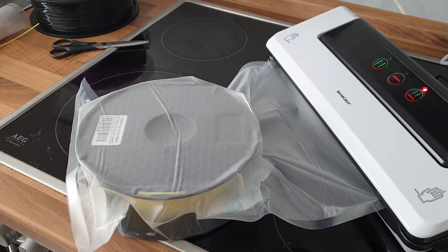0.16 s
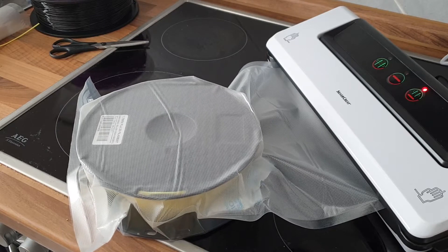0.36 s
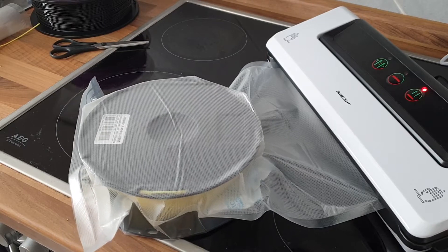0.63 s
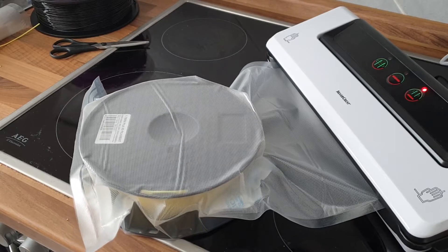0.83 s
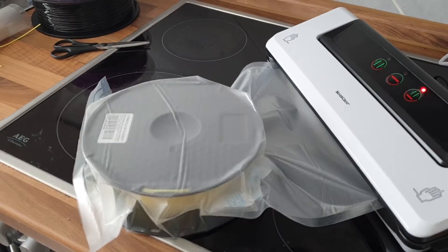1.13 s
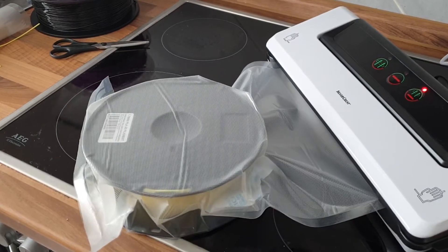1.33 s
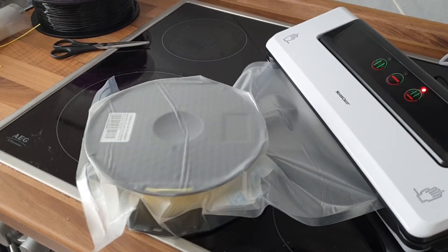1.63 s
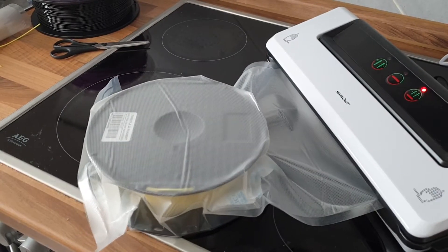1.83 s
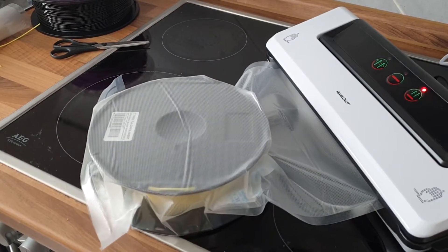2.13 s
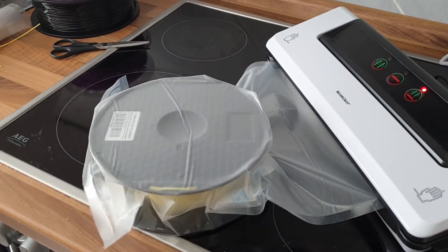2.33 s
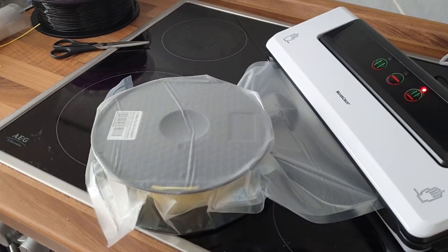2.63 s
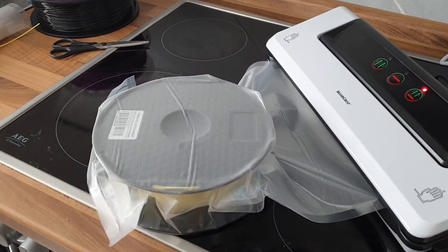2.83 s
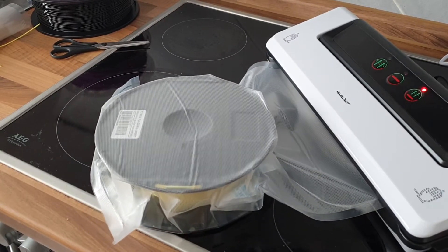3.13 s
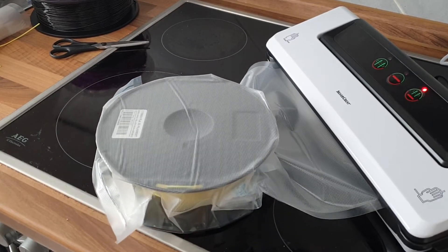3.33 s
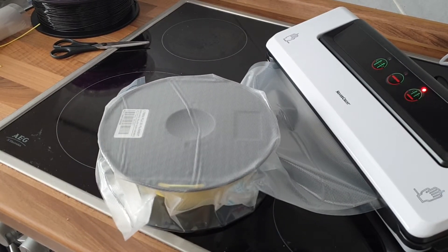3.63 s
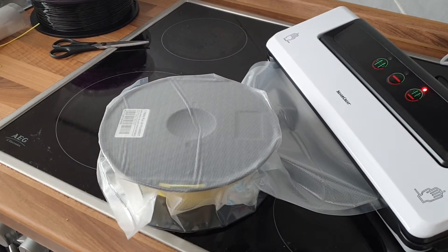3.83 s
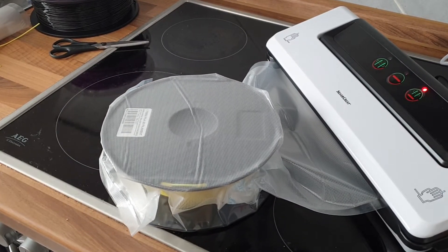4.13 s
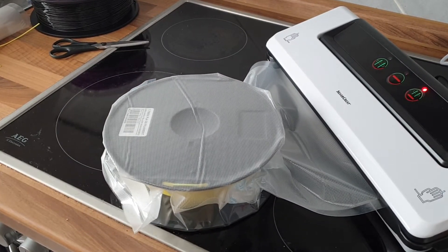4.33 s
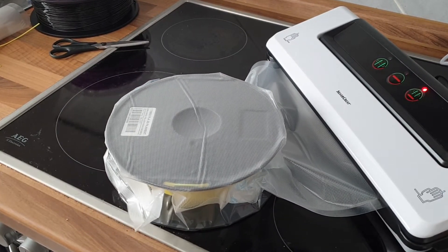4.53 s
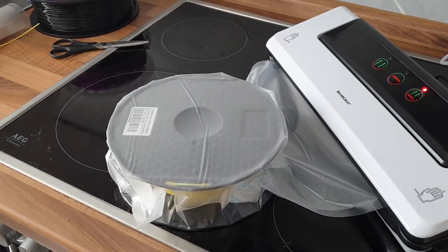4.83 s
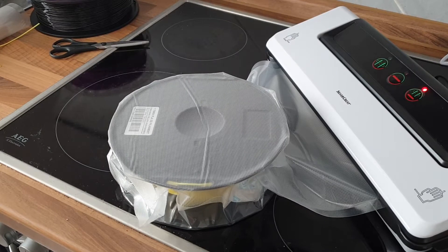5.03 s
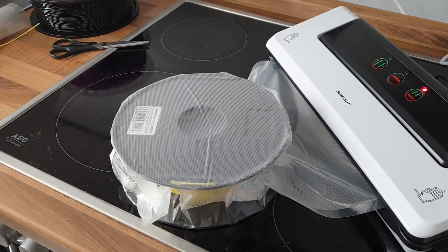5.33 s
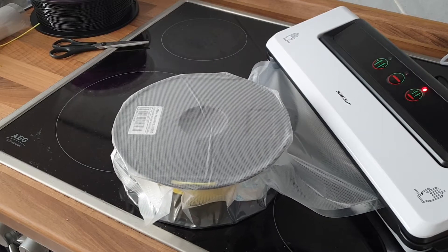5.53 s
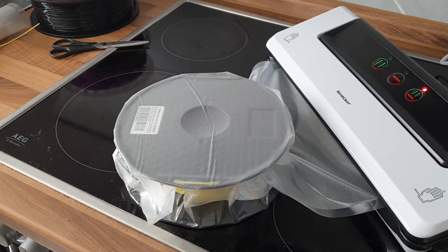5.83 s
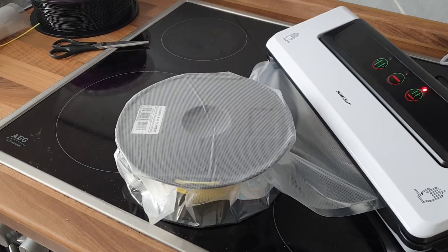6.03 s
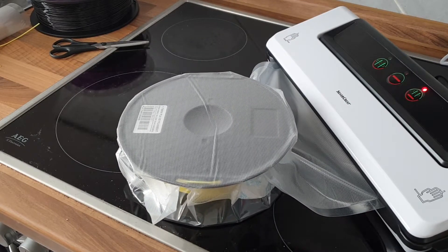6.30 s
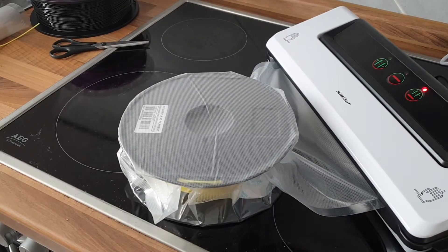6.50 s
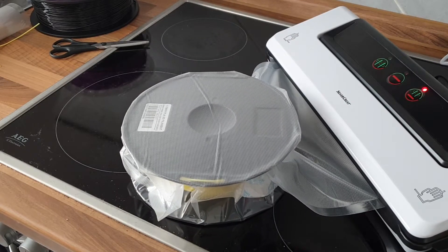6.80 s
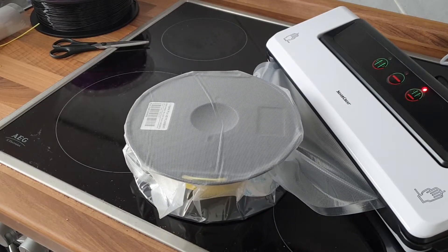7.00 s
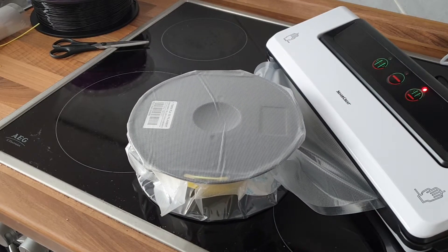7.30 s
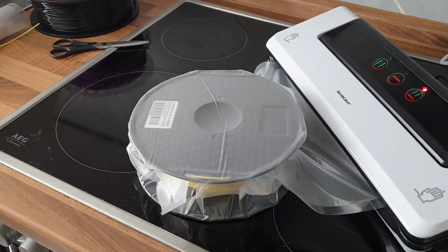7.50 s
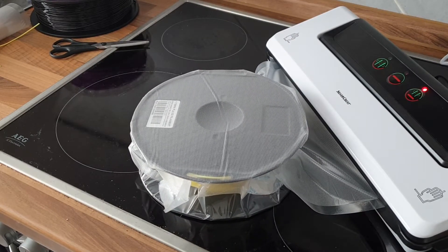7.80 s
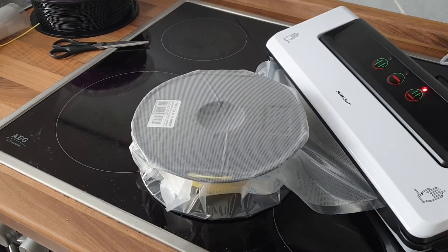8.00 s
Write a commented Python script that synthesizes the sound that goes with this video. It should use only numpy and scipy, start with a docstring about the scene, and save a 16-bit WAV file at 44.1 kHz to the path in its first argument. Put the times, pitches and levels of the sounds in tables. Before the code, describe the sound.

Steady low electric pump hum with rapid valve ticking and airy hiss, slowing very slightly, with sparse sharp crinkles of tightening plastic bag.

```python
"""A fast hum with ticks and puffs, about 70 a second: a countertop vacuum sealer's little piston pump.
It sucks the air out of a plastic bag round a lidded bowl in a kitchen, slowing and changing colour.
One shaft times the hum (sine partials), valve ticks (clicks into rings), air and puffs (shaped noise)
and valve buzzes (pulsing sines). Now and then the film snaps into creases (short noise bursts),
followed by echoes and the ring of the room."""
import sys
import numpy as np
from scipy import signal
from scipy.fft import rfft, irfft, next_fast_len
from scipy.io import wavfile

SR = 44100
rng = np.random.default_rng(int(sys.argv[2]) if len(sys.argv) > 2 else 0)


def wav_record(signal):
    """Record a signal, one row per channel, as 16-bit PCM in the file named by sys.argv[1]."""
    frames = np.transpose(np.atleast_2d(signal))
    bounded = np.clip(frames, -1, 1)
    # unit amplitude maps onto the largest positive 16-bit level
    quanta = np.round(bounded * 32767).astype(np.int16)
    wavfile.write(sys.argv[1], SR, quanta)


N = 359415
TIME = np.arange(N) / SR


def from_db(db):
    """Decibels to gain."""
    return 10 ** (np.asarray(db) / 20)


def rms_one(x):
    """Scale to rms 1."""
    return x / np.sqrt(np.mean(x ** 2) + 1e-20)


def in_time(rows):
    """A curve at every sample."""
    return np.interp(TIME, *np.transpose(rows))


def at_hz(points, hz, axis=1):
    """Read one column of a table along log frequency."""
    points = np.array(points, float)
    return np.interp(np.log(np.maximum(hz, 1)), np.log(points[:, 0]), points[:, axis])


def pan(lean_db):
    """Left and right gains of constant power; a positive lean is to the left."""
    gains = from_db(np.array([[1], [-1]]) * lean_db / 2)
    return gains / np.sqrt(np.mean(gains ** 2, axis=0))


def resonance(hz, centre, width):
    """A resonant peak of height 1, half as high at half its width to either side."""
    return 1 / (1 + (2 * (hz - centre) / width) ** 2)


def colour(x, points, rings=(), lean=None):
    """Causal (minimum-phase) filter from a spectrum and resonant peaks, with a left-right lean."""
    size = 2 * next_fast_len(x.shape[-1] // 2 + SR // 10)
    hz = np.arange(size // 2 + 1) * SR / size
    level_db = at_hz(points, hz)
    for centre, width, db in rings:
        level_db = level_db + db * resonance(hz, centre, width)
    # folding the cepstrum onto positive times gives the minimum phase
    cepstrum = irfft(np.log(from_db(level_db)))
    cepstrum[1:size // 2] *= 2
    cepstrum[size // 2 + 1:] = 0
    response = np.exp(rfft(cepstrum))
    if lean:
        response = response * pan(at_hz(lean, hz))
    return irfft(rfft(x, size) * response)[..., :x.shape[-1]]


def drift(rate):
    """Slow random wandering through `rate` knots a second, each of spread 1."""
    knots = rng.standard_normal(N // 20)
    return np.interp(TIME * rate, np.arange(len(knots)), knots)


def stereo_noise(size, alike):
    """White noise, partly shared by the two sides."""
    alike = np.clip(alike, 0, 1)
    shared = np.sqrt(alike) * rng.standard_normal(size)
    return shared + np.sqrt(1 - alike) * rng.standard_normal((2, size))


def dying(t60, alike, size=SR // 2):
    """A dense noise ring that falls 60 dB in t60 seconds, of energy 1."""
    fall = from_db(-60 * TIME[:size] / t60)
    return rms_one(stereo_noise(size, alike) * fall) / np.sqrt(size)


def gate(turns, at, depth_db):
    """A swell once in every turn, strongest at that share of the turn (weakest if the depth is negative)."""
    return rms_one(from_db(depth_db * np.cos(2 * np.pi * (turns - at))))


# the motor slows as the vacuum builds: (time [s], speed [turns/s])
SPEED = [(0, 71.458), (1.5, 71.172), (4.3, 70.777), (6.6, 70.133), (8.15, 69.849)]


def shaft():
    """Turns made by the shaft so far: its slowing speed, slightly unsteady, summed over time."""
    return np.cumsum(in_time(SPEED) + .025 * drift(25)) / SR - .11


# load on the pump: a slow creep, and a smooth step as the slack runs out
CREEP_PER_S, TIGHT_AT_S, TIGHTENING_S, TIGHT_LOAD = 0.012, 5.07, 0.43, 0.97


def suction():
    """Load (0 = free flow, 1 = bag drawn tight) creeps up, then climbs as the bag closes round the bowl."""
    closing = TIGHT_LOAD / (1 + np.exp((TIGHT_AT_S - TIME) / TIGHTENING_S))
    return CREEP_PER_S * TIME + closing - .05


# phase lag that each partial adds to the one below; the higher ones leave the housing later in the turn:
# (frequency [Hz], added lag [cycles], random scatter [rad])
LAG = [(212, 0, .03), (355, .8, .2), (430, .85, .9), (800, 1.35, 1.1), (1400, 2.0, 1.5), (1560, 2.05, .2),
       (1950, 2.35, .2), (2150, 2.3, 1.2)]
WHINE_TOP_HZ = 2150   # no partials above this
# the reflected share of a partial grows with its pitch
REFLECTED_HALF_HZ, REFLECTED_MOST = 560, 0.86


def hum(turns, load, waver_db):
    """Clean multiples of the speed; higher ones lag and waver more and reach the two sides out of step."""
    out, behind = np.zeros((2, N)), 0
    speed = in_time(SPEED)[::2000]
    for order in range(1, int(WHINE_TOP_HZ / speed.mean()) + 1):
        hz = order * speed.mean()
        free_db, loaded_db, lean_db = partial(order, speed)
        reflected = REFLECTED_MOST / (1 + (REFLECTED_HALF_HZ / hz) ** 4)
        behind += at_hz(LAG, hz)
        scatter = at_hz(LAG, hz, axis=2) * rng.normal()
        angle = (2 * np.pi * ((order * turns - behind) % 1) + scatter).astype(np.float32)
        waver = waver_db * hz / 1000 * drift(9)
        level = from_db(free_db + load * (loaded_db - free_db) + waver)
        gains = pan(lean_db)
        # reflections bring in a part that is a quarter cycle off, opposite on the two sides
        side = gains.min(axis=0) * reflected * rng.choice([-1, 1])
        direct = np.sqrt(np.abs(gains ** 2 - side ** 2)) * np.cos(angle)
        out += level * (direct + side * np.array([[1], [-1]]) * np.sin(angle))
    return out


# low hum of the housing, relative levels:
# (multiple of the speed, free-flow level [dB], loaded level [dB], left-right lean [dB])
HUM = [(1, -41.8, -39.1, 0.9), (2, -27.7, -28.6, 0.2), (3, -31.6, -33.9, 2.3), (4, -52, -40.7, 4.6),
       (5, -44.5, -44.0, 8.7), (6, -48.3, -46.5, -8.2), (7, -46.3, -46.2, -1.3), (8, -43.7, -46.6, -8.2),
       (9, -50, -40.7, -7.9), (10, -61, -51, -2.4), (11, -47.5, -53.2, 2.7), (12, -50.5, -48.5, 0.5)]
# cavities of the pump and its outlet, which the partials slide through as the motor slows:
# (frequency [Hz], width [Hz], free-flow boost [dB], loaded boost [dB], left-right lean [dB])
CAVITIES = [(978, 28, 16.5, 12, -7.5), (1129.3, 23, 14, 12.5, 19), (1194, 18.5, -2.5, 2.5, 12),
            (1265, 8.5, -4, 6, -5), (1614, 54, 9.5, -2, 2), (1693.6, 94, 16.5, 12, 8),
            (1835.4, 122, 13, 7, -2.5)]
# above the hum the multiples are weak and even, except where a cavity rings (relative levels)
WHINE_DB, WHINE_LOAD_DB, WHINE_LEAN_DB = -58, 1, -1.5


def partial(order, speed):
    """Free-flow level, loaded level and lean of one multiple, in dB: housing hum or cavity-lifted whine."""
    if order <= len(HUM):
        return HUM[order - 1][1:]
    hz = order * speed
    free, loaded, lean = sum(np.outer(dbs, resonance(hz, centre, width))
                             for centre, width, *dbs in CAVITIES)
    when = np.linspace(0, TIME[-1], len(hz))
    free_db = np.interp(TIME, when, WHINE_DB + free)
    loaded_db = np.interp(TIME, when, WHINE_DB + WHINE_LOAD_DB + loaded)
    return free_db, loaded_db, WHINE_LEAN_DB + lean.mean()


# the two valves shutting: (share of a turn, relative level [dB])
VALVES = [(.44, -1.5), (.9, 0.5)]
# spectrum of their ticking: (frequency [Hz], relative level [dB])
TICK = [(1900, -33.5), (2200, -0.5), (2700, -3.5), (3600, 0), (4500, -2), (5300, -4.5), (5800, 0),
        (6400, -7), (7600, -6.5), (8500, -26), (9600, -13.5), (15500, -11)]
# rings of the pump body, also heard in the air: (frequency [Hz], width [Hz], free-flow [dB], loaded [dB])
BODY = [(2356, 240, 0.5, 8), (3010, 38, 8, 4), (3330, 34, 9, 10), (4288, 59, 12, 7), (4980, 140, 2, 7),
        (5660, 144, 10, 1.5), (7100, 180, -2, 2.5), (7750, 260, 8.5, 1.5), (9600, 160, 5, -11)]
# the pump's treble from side to side, also for the air: (frequency [Hz], left-right lean [dB])
LEAN = [(60, 3), (110, -7), (200, 8), (380, -7), (700, -6), (1290, -9), (2380, 6), (4400, 2), (8120, -2),
        (15000, -6.5)]


def valves(turns, load, jitter_s, uneven_db, ring_t60, room_db):
    """Each valve shuts once a turn and rings the pump body; the load shifts which rings are strong."""
    free, tight, count = np.zeros((2, N)), np.zeros((2, N)), int(turns[-1])
    for share, level_db in VALVES:
        shut_turns = np.arange(count) + share
        when = np.interp(shut_turns, turns, TIME) + jitter_s * rng.standard_normal(count)
        force = from_db(level_db + uneven_db * rng.standard_normal(count))
        # a short sinc places each click between samples
        taps = (when * SR).astype(int)[:, None] + np.arange(-6, 7)
        clicks = np.zeros(N)
        clicks[np.clip(taps, 0, N - 1)] = force[:, None] * np.sinc(taps - when[:, None] * SR)
        for state in (free, tight):
            housing = dying(ring_t60, alike=0.01) + from_db(room_db) * dying(t60=0.42, alike=0.043)
            state += signal.oaconvolve(clicks[None], housing, axes=1)[:, :N]
    free_rings = [(hz, width, free_db) for hz, width, free_db, _ in BODY]
    tight_rings = [(hz, width, loaded_db) for hz, width, _, loaded_db in BODY]
    free = rms_one(colour(free, TICK, free_rings, LEAN))
    tight = rms_one(colour(tight, TICK, tight_rings, LEAN))
    return np.cos(load * np.pi / 2) * free + np.sin(load * np.pi / 2) * tight


# spectrum of the rush of air and motor: (frequency [Hz], relative density [dB/Hz])
RUSH = [(25, 1), (60, 2.5), (170, 9.5), (400, 0), (1300, 0), (2050, 0.5), (2650, -3), (4400, -1.5),
        (5800, -3), (7600, -7.5), (8600, -12.5), (10300, -3.5), (12000, -11), (15500, -9.5)]


def air(turns):
    """Air rushes through the pump body and takes on its rings, swelling a little with each stroke."""
    strokes = gate(turns, at=0.87, depth_db=2.0) * gate(2 * turns, at=0.57, depth_db=-1.5)
    flow = stereo_noise(N, alike=0.089) * strokes
    rings = [(hz, width, 0.46 * (free_db + loaded_db)) for hz, width, free_db, loaded_db in BODY]
    return rms_one(colour(flow, RUSH, rings, LEAN))


# spectrum of the exhaust puff: (frequency [Hz], relative density [dB/Hz])
PUFF = [(1200, -20), (1520, -15), (1710, 6), (1860, 0.5), (2300, -18.5)]


def exhaust(turns):
    """One puff a turn sounds the outlet cavity."""
    puff = stereo_noise(N, alike=0.025) * gate(turns, at=.19, depth_db=5)
    return pan(1.5) * rms_one(colour(puff, PUFF))


# valve buzzes that swell and fade as the pressure passes them: (peak time [s], half length [s],
# relative level [dB], multiple of the speed, share of a turn, swell within the turn [dB])
BUZZES = [(0, 1.2, -47.5, 48, .5, 4), (1.0, 1.2, -53, 81, .9, 10), (2.9, .9, -52, 53, .5, 3),
          (3.4, 1.2, -51, 48, .5, 4), (4.3, 1.0, -55, 81, .9, 10), (5.7, 1.0, -52, 31, .2, 6),
          (8.1, .9, -48.5, 35, .9, 16), (8.1, .7, -48, 82, .9, 5)]


def flap(turns):
    """Light valve flaps buzz in a short burst once a turn, each over its own stretch of the pressure."""
    out = np.zeros(N)
    for peak_s, half_s, level_db, order, share, swell_db in BUZZES:
        level = from_db(level_db + 1.1 * drift(40)) / (1 + ((TIME - peak_s) / half_s) ** 2)
        tone = np.cos(2 * np.pi * order * turns)
        out += level * rms_one(gate(turns, share, swell_db) * tone)
    return out


# snaps of the film:
# (time [s], relative level at strongest pitch [dB], that pitch [Hz], fall to either side [dB/octave])
SNAPS = [(0.2914, -0.5, 2270, 2.0), (1.0118, 0.5, 3720, 7), (1.666, 7, 970, 9), (2.6266, -9, 1700, 6),
         (3.4087, 14, 300, 5.5), (3.905, 14.8, 1830, 9), (3.922, 6.5, 2650, 22), (4.24, 7, 2540, 15.8),
         (4.273, 5, 1010, 9.0), (4.3439, 13, 1440, 8.6), (5.138, 9.5, 990, 6.5), (5.632, 13, 1950, 5),
         (6.1144, -4.5, 3730, 6), (6.4515, 5, 1510, 10.5), (7.034, -1, 3840, 10), (7.193, 8, 2670, 3.5),
         (7.3903, 11.5, 1410, 11), (7.498, 8, 1100, 9), (7.5055, 15, 1660, 10.5), (7.6476, 10, 2200, 4.5),
         (7.794, 5, 3100, 9), (7.8925, 8, 1520, 9.5), (7.9577, 3, 890, 7)]
# slips as the crease runs on: (time [s], level against the crack of the snap before [dB])
RUNS = [(3.9098, -12), (3.932, 3), (3.963, -5), (4.35, -7), (5.645, -19), (5.661, -16)]
# rings of the stretched film: (frequency [Hz], width [Hz], boost [dB])
SHEET = [(2480, 170, -0.5), (2870, 240, -2.5), (5030, 210, 7), (6900, 1100, 5), (8860, 830, -6)]
# echoes from worktop, tiles and cupboards, before random spread: (delay [s], level [dB])
ECHOES = [(.0034, -9), (0.0123, -10), (.019, -36)]


def film(crack_t60, shiver_db, shiver_t60, shiver_low_hz, room_db, room_t60, spread_db):
    """A crease flips with a sharp crack and may run on, the sheet shivers; echoes and room answer."""
    out = np.zeros((2, N + SR))
    # a light sheet holds no low notes
    thin = signal.butter(1, shiver_low_hz, "high", fs=SR, output="sos")
    for s, level_db, pitch_hz, fall_db in SNAPS:
        spectrum = snap_spectrum(level_db, pitch_hz, fall_db)
        crack = dying(crack_t60, alike=0.17)
        # the more treble in the snap, the more the sheet shivers
        shiver_gain = from_db(shiver_db + 0.16 * spectrum[-1, 1])
        shiver = shiver_gain * signal.sosfilt(thin, dying(shiver_t60, alike=0.21))
        snap = crack + shiver + from_db(room_db) * dying(room_t60, alike=0.069)
        for delay, echo_db in ECHOES:
            # each side gets its own delay
            echo = [np.roll(side, int(delay * rng.uniform(0.58, 1.15) * SR)) for side in crack]
            snap += from_db(echo_db) * np.array(echo)
        next_s = min([row[0] for row in SNAPS if row[0] > s], default=np.inf)
        for slip_s, slip_db in RUNS:
            if s < slip_s < next_s:
                slip = dying(crack_t60, alike=0.16)
                snap += from_db(slip_db) * np.roll(slip, int((slip_s - s) * SR), axis=1)
        # each facet of film rings near the pitch of its crease
        facets = [(pitch_hz * 2 ** rng.uniform(-0.3, 0.48), 0.12 * pitch_hz, 4) for _ in range(2)]
        snap = colour(snap, spectrum, SHEET + facets) * pan(spread_db * rng.normal())
        start = int(s * SR)
        out[:, start:start + snap.shape[1]] += snap
    return out[:, :N]


SNAP_CREST_OCTAVES = 0.47   # width of the rounded top of a snap's spectrum
SNAP_BASS_SHARE = 0.66   # the fall is gentler below the pitch of the crease


def snap_spectrum(level_db, pitch_hz, fall_db):
    """A rounded hill about the pitch of the crease: rows of (frequency [Hz], level [dB])."""
    hz = np.geomspace(60, 16000, 40)
    away = np.hypot(SNAP_CREST_OCTAVES, np.log2(hz / pitch_hz)) - SNAP_CREST_OCTAVES
    slope_share = np.where(hz < pitch_hz, SNAP_BASS_SHARE, 1)
    return np.column_stack([hz, level_db - fall_db * away * slope_share])


def scene():
    """One shaft times all the pump's sounds; less air passes as the load rises."""
    load = suction()
    turns = shaft()
    drone = from_db(3.0) * hum(turns, load, waver_db=0.5)
    clatter = valves(turns, load, jitter_s=.000004, uneven_db=1.0, ring_t60=.008, room_db=2)
    ticks = from_db(-41.5 - 0.79 * load) * clatter
    rush = from_db(-42.5 - 1.0 * load) * air(turns)
    puffs = from_db(-51.5 - 11.0 * load) * exhaust(turns)
    buzzes = from_db(-5.5) * pan(1.5) * flap(turns)
    crackle = from_db(-6.0) * film(crack_t60=.012, shiver_db=0, shiver_t60=.15, shiver_low_hz=1700,
                                   room_db=-4.2, room_t60=.33, spread_db=1.0)
    return drone + ticks + rush + puffs + buzzes + crackle


CUTOFF_HZ = 15850


def record(dry):
    """A steep elliptic low-pass cuts off the top."""
    return signal.sosfilt(signal.ellip(12, .1, 90, CUTOFF_HZ, fs=SR, output="sos"), dry)


dry = scene()
out = record(dry)
wav_record(out)
```